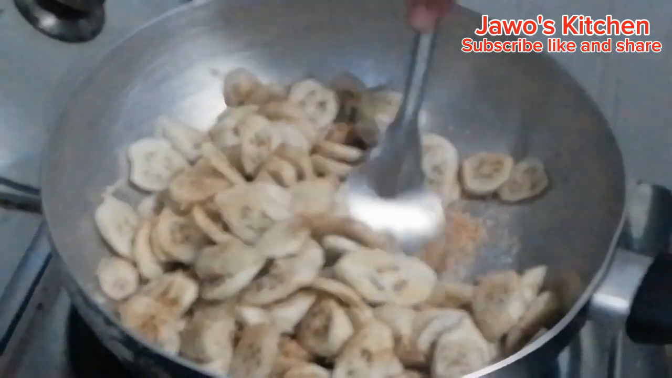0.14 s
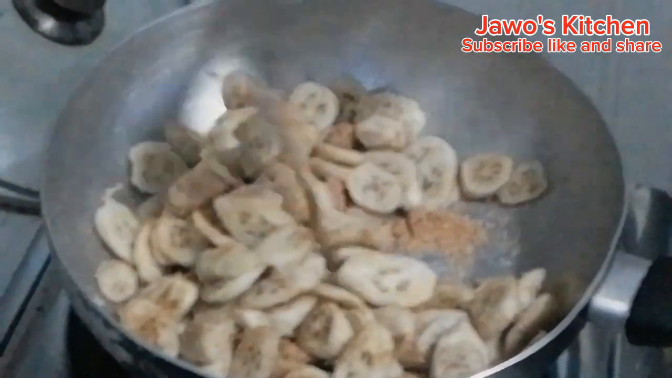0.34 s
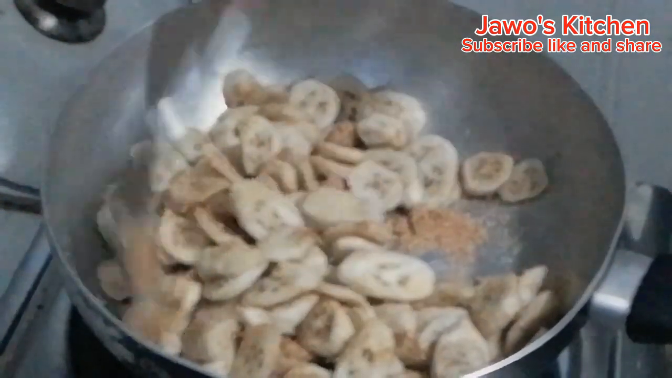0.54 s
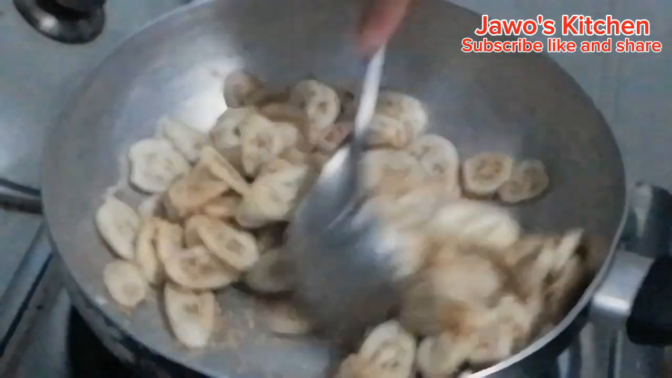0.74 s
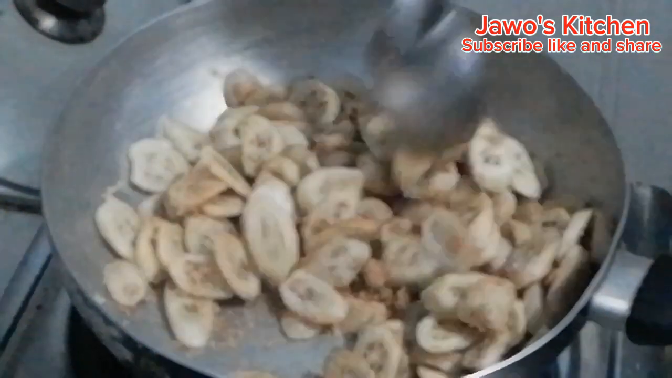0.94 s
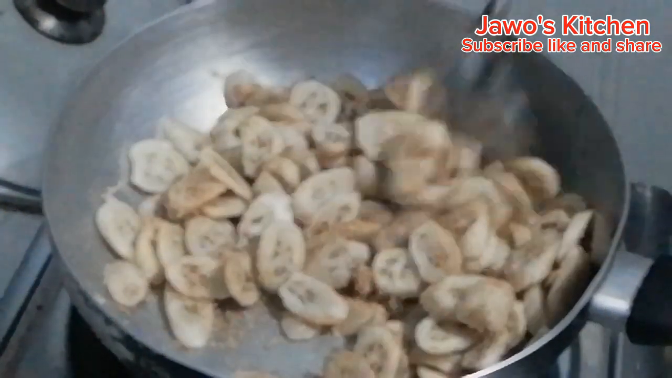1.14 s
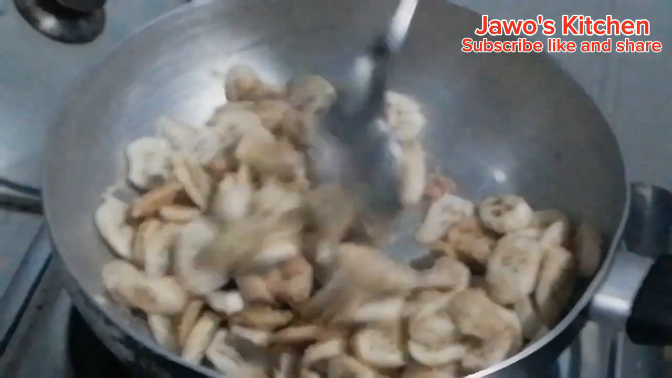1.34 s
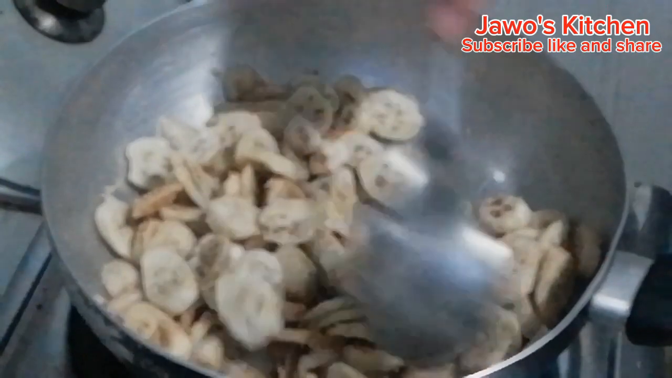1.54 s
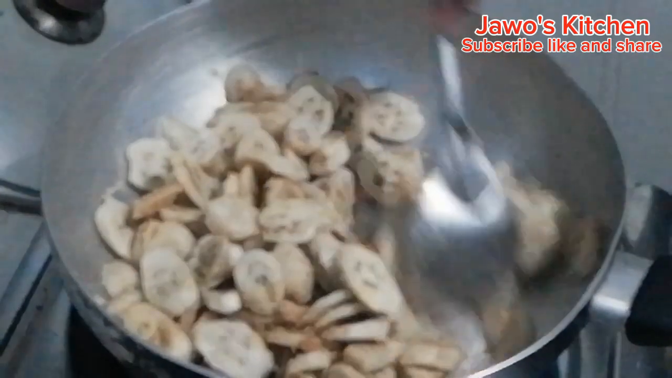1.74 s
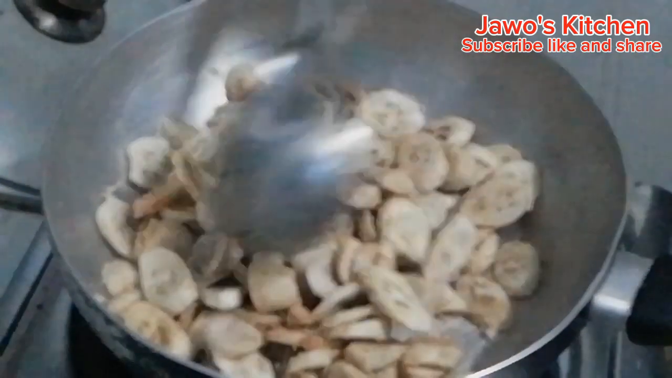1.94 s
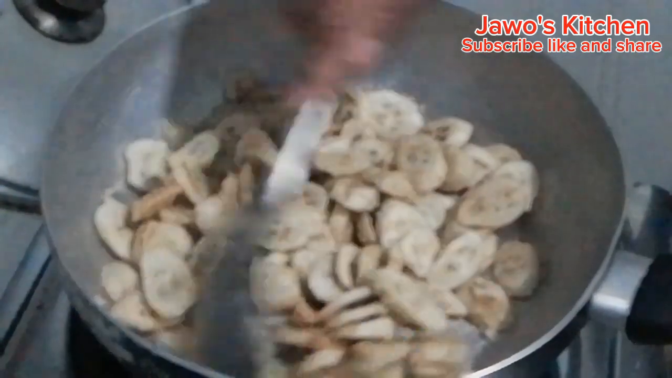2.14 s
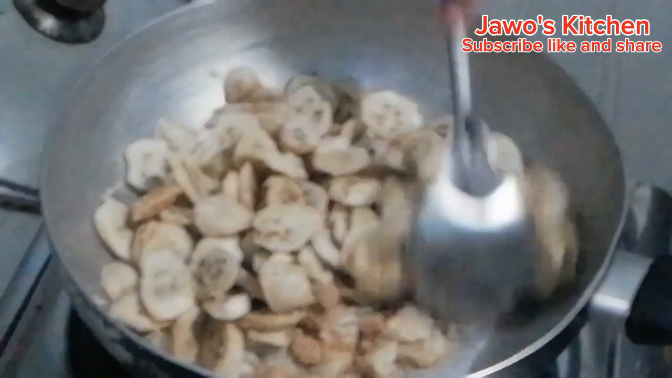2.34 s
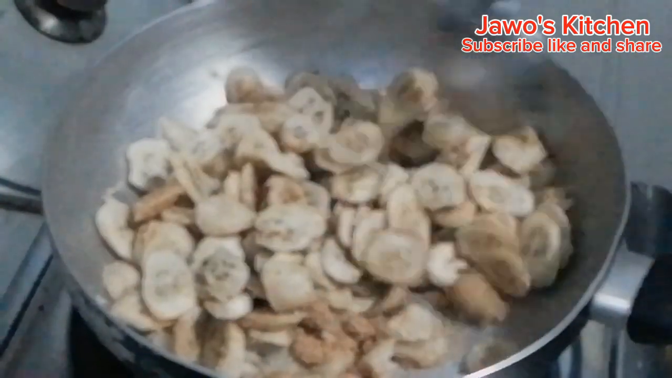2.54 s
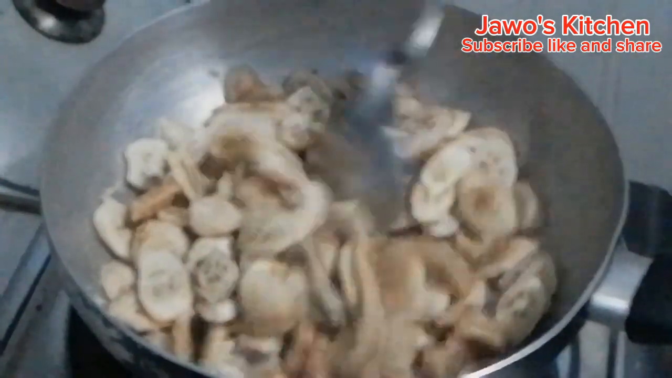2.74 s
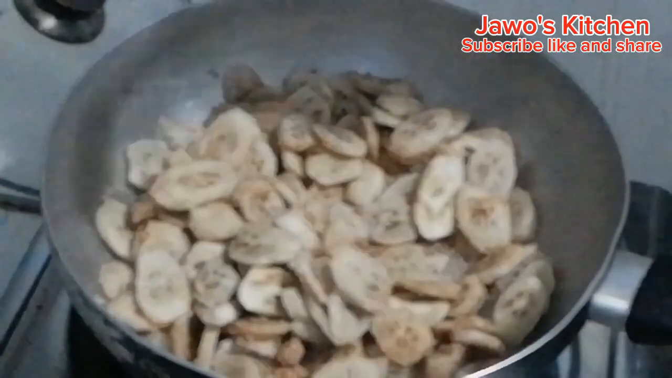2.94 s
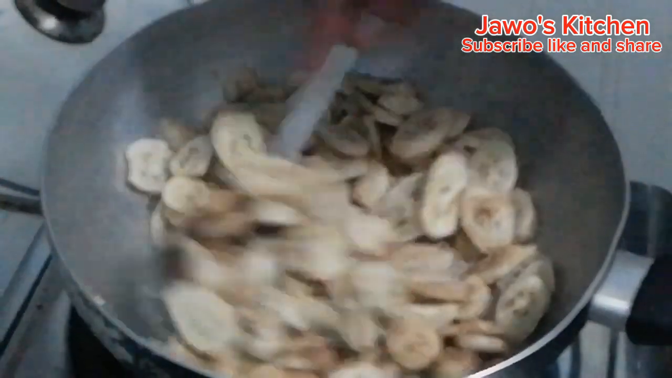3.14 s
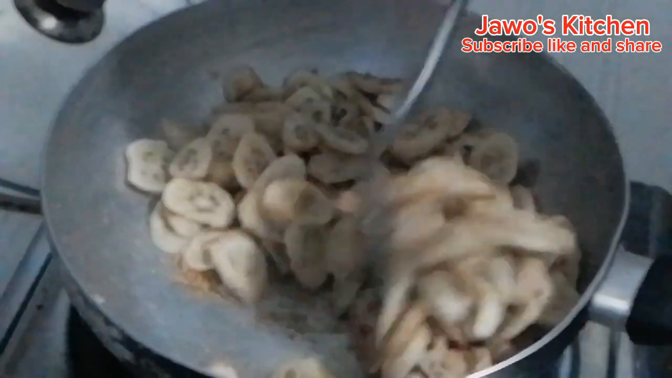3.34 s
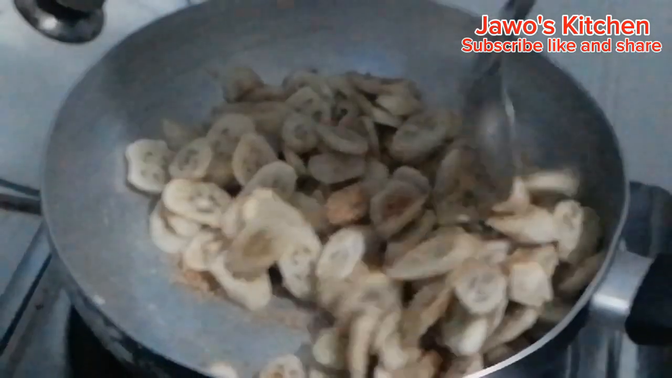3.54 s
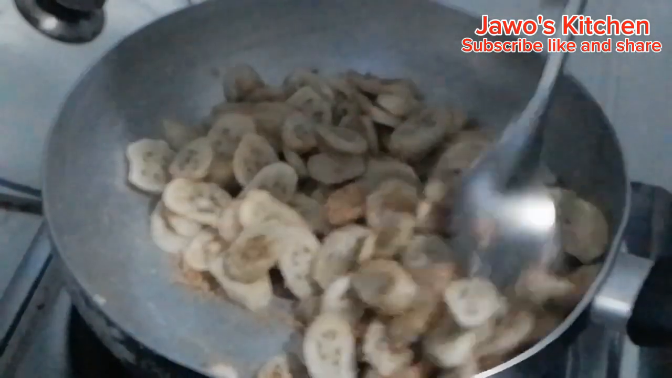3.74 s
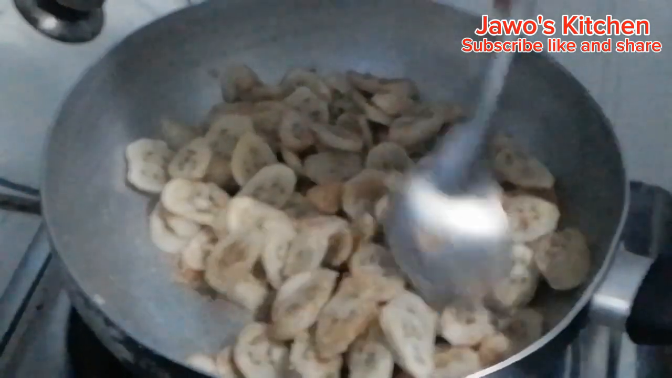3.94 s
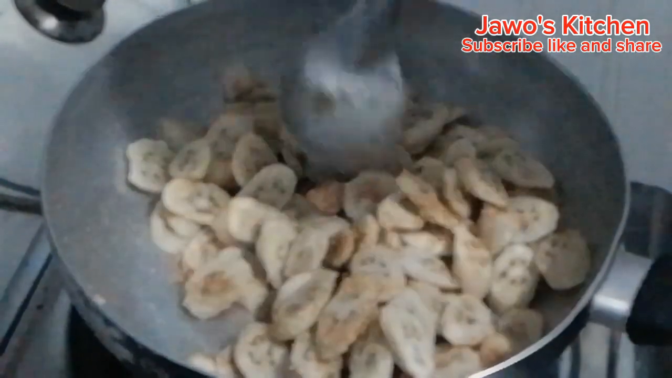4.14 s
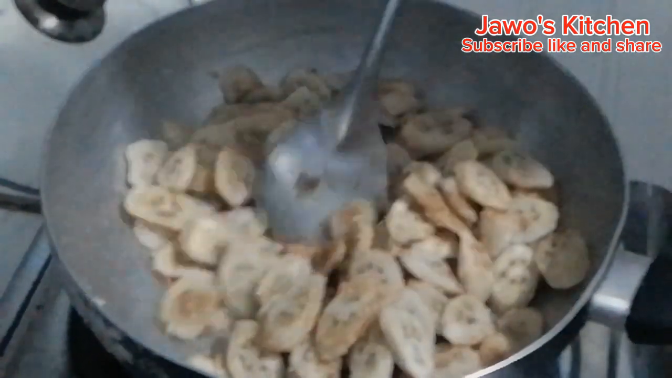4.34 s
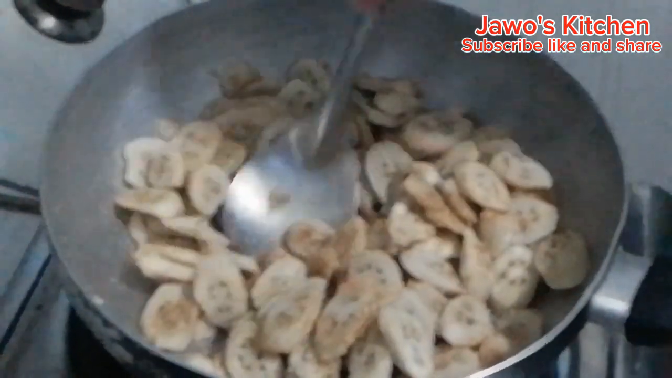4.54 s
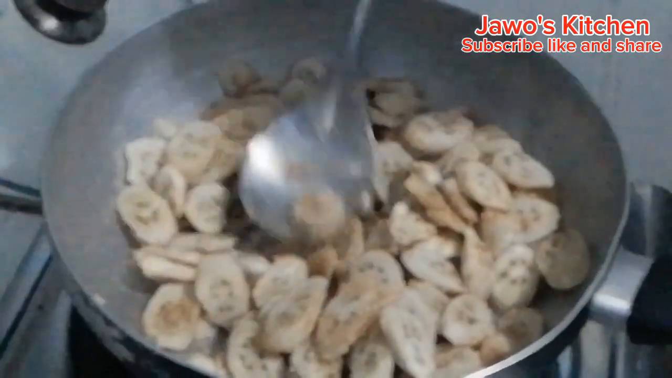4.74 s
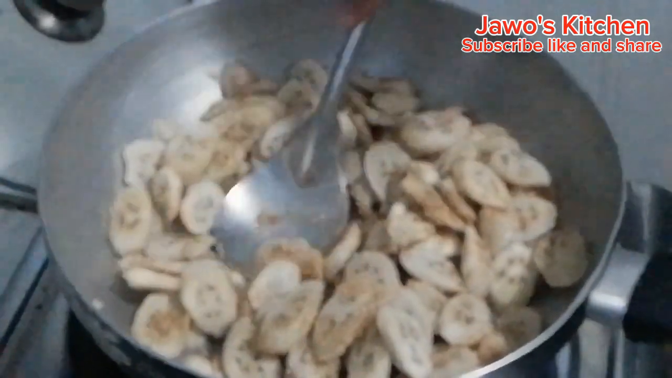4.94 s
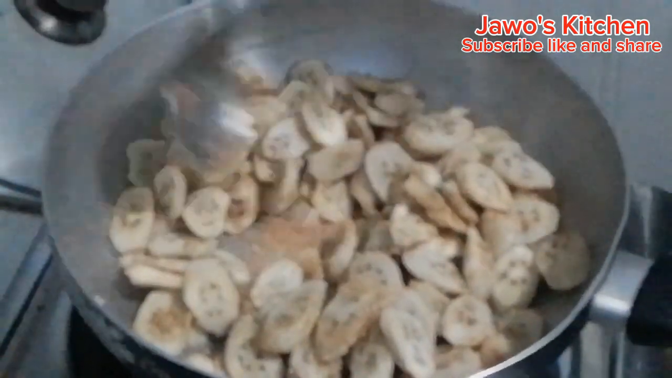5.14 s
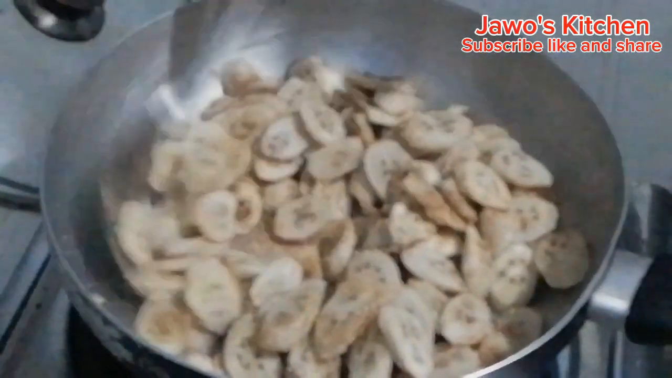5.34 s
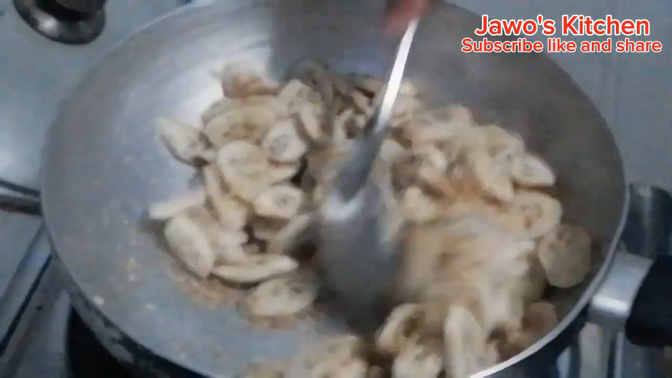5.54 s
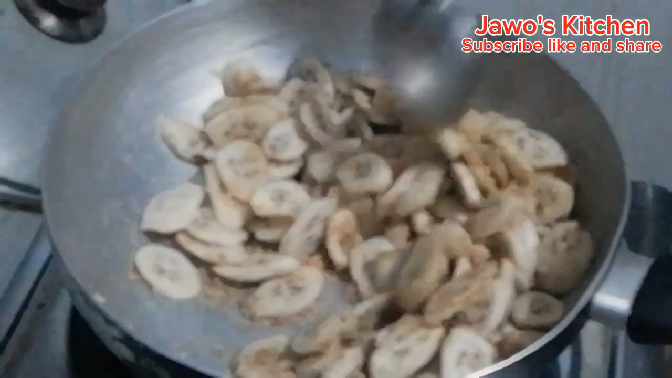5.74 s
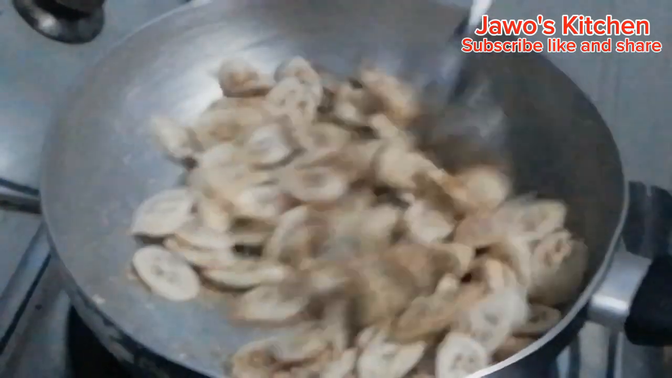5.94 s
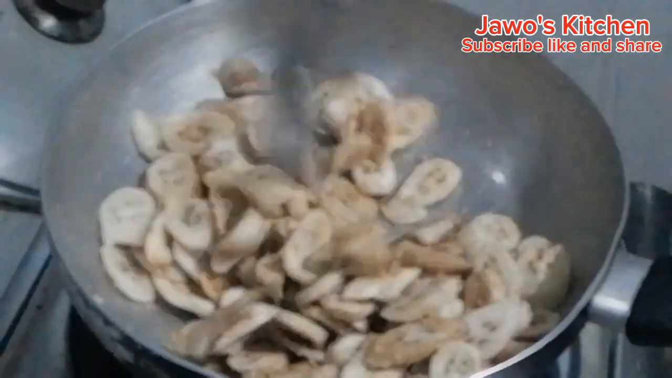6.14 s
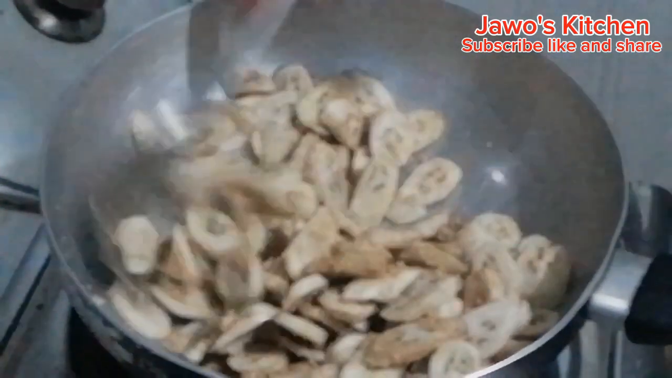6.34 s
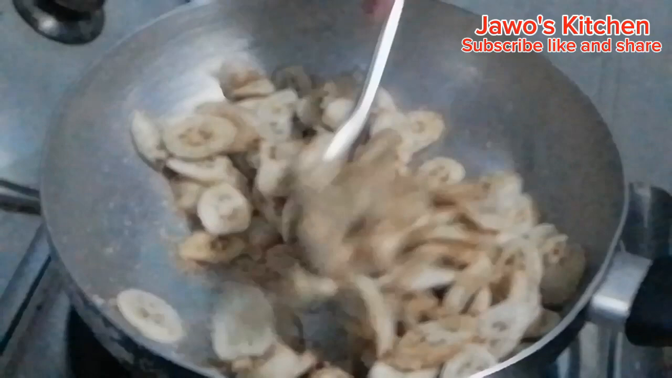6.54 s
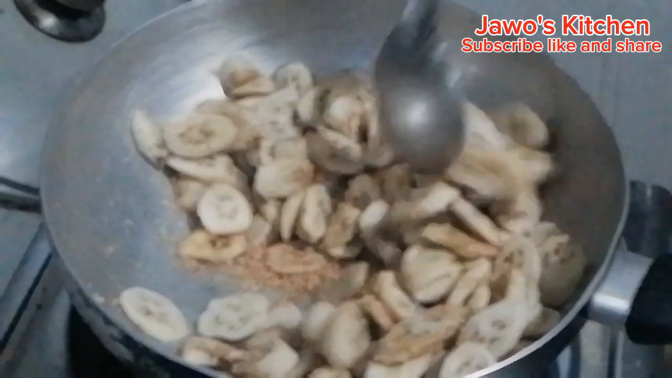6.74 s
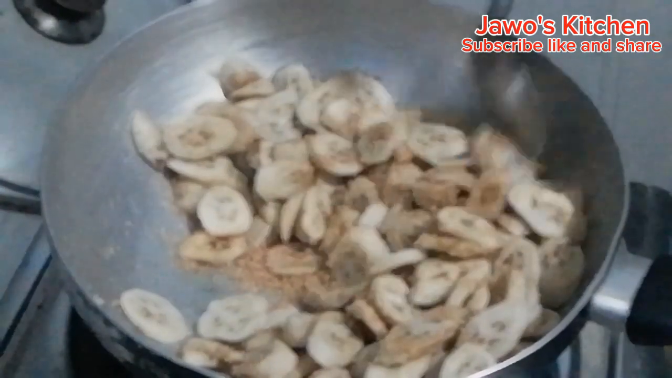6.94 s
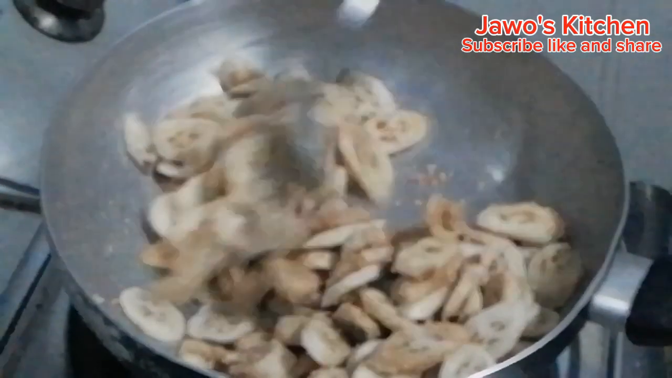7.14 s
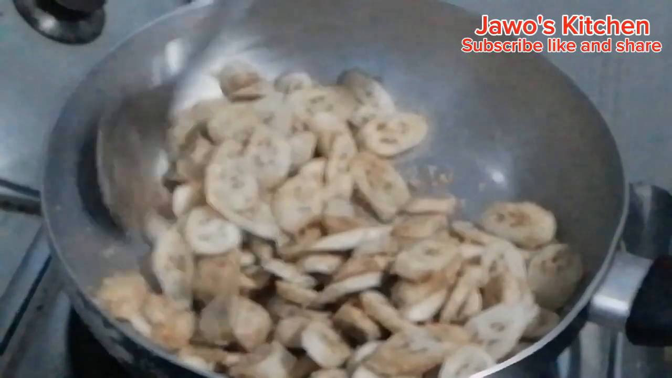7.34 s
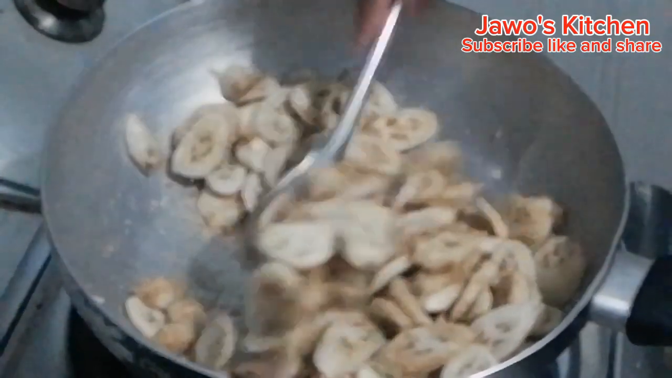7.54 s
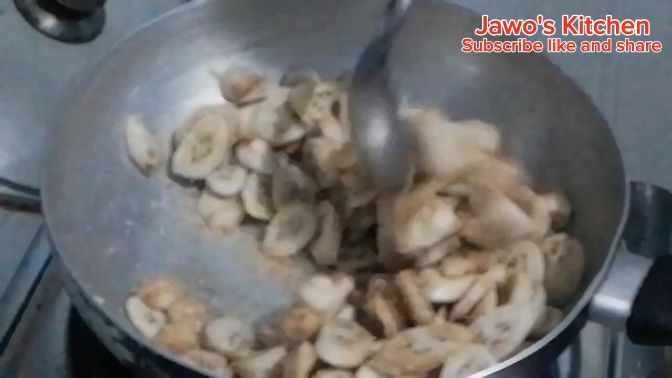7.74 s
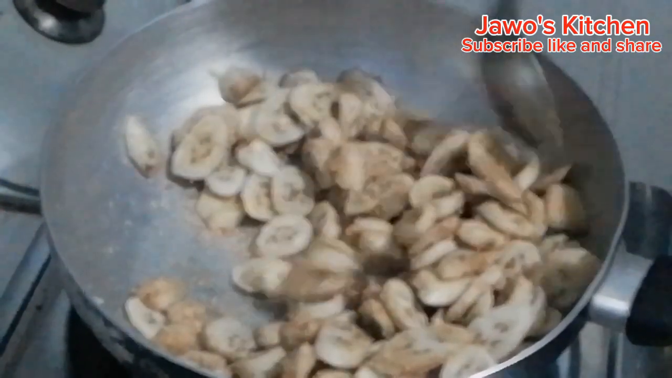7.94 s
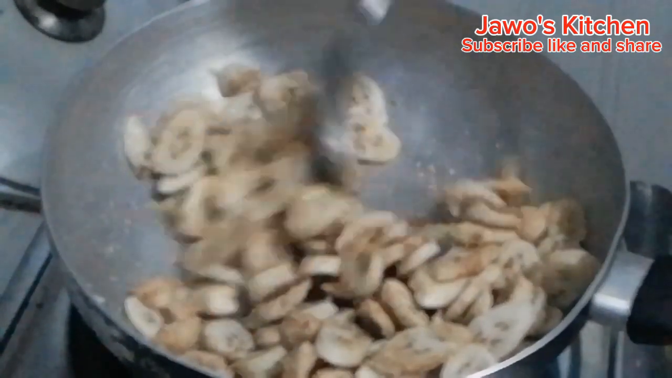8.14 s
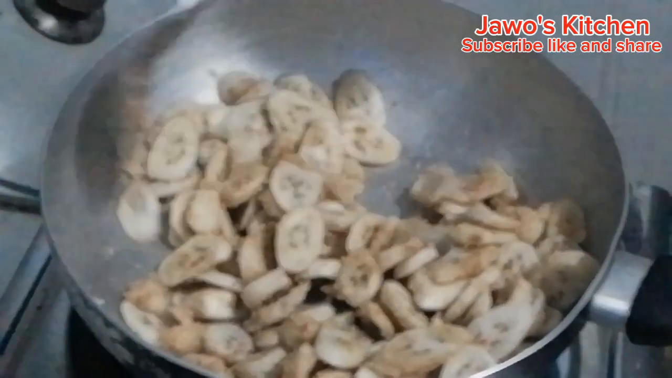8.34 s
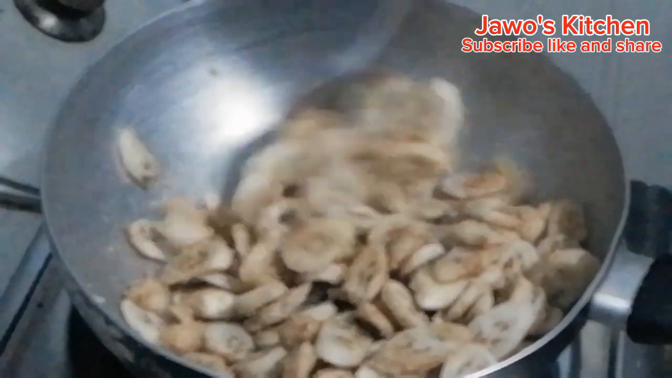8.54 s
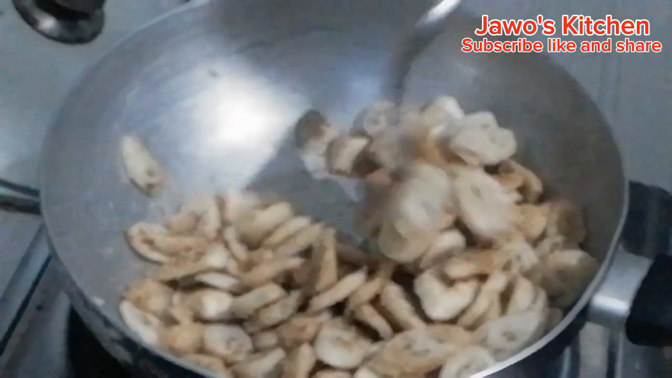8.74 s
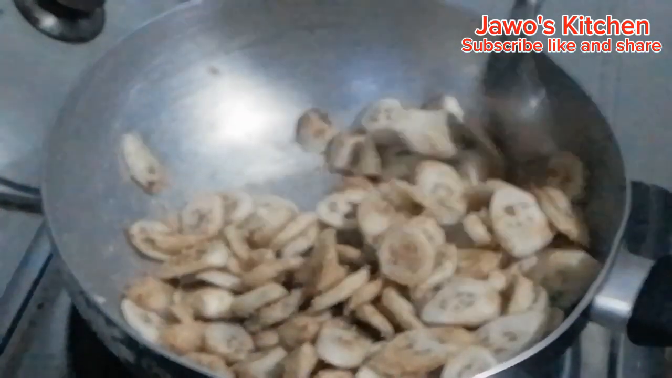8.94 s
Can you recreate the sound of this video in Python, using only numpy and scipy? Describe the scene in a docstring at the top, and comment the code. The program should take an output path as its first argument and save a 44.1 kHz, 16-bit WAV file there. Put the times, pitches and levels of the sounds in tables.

```python
"""A gritty scrape and a clack of steel open the scene: a ladle lands in a dry wok in a hard small kitchen.
It goes on scraping through crisp slices, stroke after stroke.
Friction is uneven bursts of noise, blows are short snaps and pings; both ring the modes of one bowl.
Behind lie soft hollow puffs of resonant noise and a low wavering hum of sine waves, drone and room tone.
Two spaced microphone ports hear it, the left one brighter."""
import sys
import numpy as np
from scipy import signal
from scipy.fft import rfft, irfft, next_fast_len
from scipy.io import wavfile
from scipy.ndimage import uniform_filter1d, map_coordinates

SR = 44100
rng = np.random.default_rng(int(sys.argv[2]) if len(sys.argv) > 2 else 0)


def to_wav(sig):
    """Store sig (one row per channel, or 1-D mono) as 16-bit WAV at the path in sys.argv[1].

    Samples outside -1..1 are clipped; the rate is SR.
    """
    pcm = np.clip(np.atleast_2d(sig), -1, 1) * 32767
    pcm = np.round(pcm).astype(np.int16)
    wavfile.write(sys.argv[1], SR, pcm.T)  # frames by channels


N = 400428  # length in samples


def amp(db):
    """Decibels turned into a plain gain."""
    return 10 ** (np.asarray(db) / 20)


def unit(x):
    """The signal scaled to an rms of one."""
    return x / np.sqrt(np.mean(x ** 2) + 1e-20)


def along(points, hz):
    """Read a curve of (Hz, value) points, joined by straight lines on a log frequency axis."""
    point_hz, values = np.transpose(points)
    return np.interp(np.log(hz + 1), np.log(point_hz + 1), values)


def filtered(x, response):
    """Filter x by multiplying its spectrum with a response, which may be complex."""
    size = 2 * next_fast_len((N + SR) // 2)  # spare room at the end, so tails do not wrap around
    spectrum = rfft(x, size) * response(np.fft.rfftfreq(size, 1 / SR))
    return irfft(spectrum, size)[..., :N]


def even(response):
    """The response scaled so that white noise keeps its level."""
    scale = np.sqrt(np.mean(np.abs(response(np.arange(1, SR // 2))) ** 2))
    return lambda hz: response(hz) / scale


def modes(table):
    """A sum of resonances that ring only after they are struck; a narrow one rings longer."""
    def response(hz):
        total = 0
        for k, (centre, width, db) in enumerate(table):
            damping = 1j * hz * width
            resonance = damping / (centre * centre - hz * hz + damping)
            total = total + (-1) ** k * amp(db) * resonance  # neighbours have opposite signs
        return total
    return even(response)


def causal(points):
    """Minimum-phase response: the gain curve of the (Hz, dB) points, with the sound as early as possible."""
    def response(hz):
        cepstrum = irfft(np.log(amp(along(points, hz)) + 1e-4))
        # folding the second half onto the first gives the minimum phase
        cepstrum[1:len(hz) - 1] *= 2
        cepstrum[len(hz):] = 0
        return np.exp(rfft(cepstrum))
    return even(response)


def swells(rows, sag_db, end_db):
    """Each row rises, sags slowly while it lasts and then dies faster; losses are in dB per second."""
    power = np.zeros(N + SR)
    t = np.arange(SR // 2) / SR
    for start, rise, length, db, *_ in rows:
        sag = sag_db * (t.clip(max=length) - rise).clip(0)
        ending = end_db * (t - length).clip(0)
        climb = (t / max(rise, 1 / SR)).clip(max=1)
        power[round(start * SR):][:len(t)] += (climb * amp(db - sag - ending)) ** 2
    return np.sqrt(power[:N])


def latest(rows, column):
    """For each sample, that column of the row that started last."""
    table = np.array(rows)
    started = np.searchsorted(table[:, 0] * SR, np.arange(N), side="right")
    return table[started.clip(1) - 1, column]


# How alike diffuse sound is at the two ports.
# Each row: frequency in Hz, likeness from -1 (opposite) to 1 (the same).
LIKENESS = [(60, 1.0), (130, 0.98), (290, 0.81), (640, -0.41), (1410, 0.23), (3100, 0.16), (6820, -0.082),
            (15000, -0.23)]


def diffuse(pair):
    """Two unrelated signals mixed to the likeness that spaced ports hear."""
    def mid_and_side(hz):
        angle = np.arccos(np.clip(along(LIKENESS, hz), -1, 1)) / 2
        return np.array([np.cos(angle), np.sin(angle)])
    mid, side = filtered(pair, mid_and_side)
    return np.array([mid + side, mid - side])


# Colour of the room tone. Each row: frequency in Hz, relative level in dB per Hz.
ROOM_TONE = [(15, -30), (45, -10), (130, -11), (234, -12), (280, -14), (433, -20), (1410, -22.5),
             (1870, -28), (5500, -35), (10400, -33), (16600, -51.5)]


def hum():
    """A motor of wavering speed and a fuzzy drone, alike at both ports, over the room tone."""
    motor_hz, motor_db = 28.1, [-58, -65.5, -65.5, -58.5]  # speed, and rms level of multiples 1 to 4
    drone_db, air_db = -58.0, -56.0
    knots = rng.standard_normal(N // 5000 + 4)  # one random speed every 5000 samples
    speed = 1 + .02 * map_coordinates(knots, [np.arange(N) / 5000])
    turn = 2 * np.pi * np.cumsum(motor_hz * speed) / SR
    motor = sum(np.sqrt(2) * amp(db) * np.sin((k + 1) * turn) for k, db in enumerate(motor_db))
    drone = filtered(rng.standard_normal(N), modes([(156.06, 1.9, 0)]))  # centre Hz, width Hz, dB
    air = filtered(rng.standard_normal((2, N)), even(lambda hz: amp(along(ROOM_TONE, hz))))
    return motor + amp(drone_db) * drone + amp(air_db) * diffuse(air)


# Soft hollow puffs. Each row: start in seconds, rise in seconds, length in seconds, level in dB,
# low resonances over high ones in dB.
PUFF_ROWS = [(0.27, 0.047, 0.14, -41.5, 0.5), (2.52, 0.075, 0.1, -38, 4), (2.7, 0.032, 0.23, -52, 23),
             (2.89, 0.058, 0.096, -46.5, 2), (4.27, 0.011, .2, -58, -29), (4.48, 0.051, 0.091, -39, 10),
             (4.6, 0.052, 0.11, -44, 20), (5.44, 0.0076, 0.17, -35.5, 9), (6.23, 0.065, 0.064, -39, 3),
             (7.08, 0.026, 0.22, -40, 2), (7.92, 0.021, 0.22, -38.5, 2.5), (9.02, 0.0051, 0.012, -32.5, -4)]
# Low and high group of puff resonances. Each row: frequency in Hz, width in Hz, relative level in dB.
HOLLOW_MODES = [
    [(619, 46, 7.5), (700, 153, 0), (890, 220, -6.5)],
    [(863, 49, -5.5), (1080, 380, -20.5), (1450, 170, -21.5)],
]


def puffs():
    """Soft airy swells of noise, each leaning to the lower or the higher hollow resonances."""
    level = swells(PUFF_ROWS, sag_db=49, end_db=105)
    level = uniform_filter1d(level, size=200)  # softens the corners
    lean = amp(latest(PUFF_ROWS, column=4))
    total = np.hypot(1, lean)  # the two shares together keep the power
    out = 0
    for share, table in zip([lean / total, 1 / total], HOLLOW_MODES):
        out = out + filtered(share * level * rng.standard_normal((2, N)), modes(table))
    return out


# Scraping strokes. Each row: start in seconds, rise in seconds, length in seconds, friction level in dB,
# then the weight in dB on the modes of the rim, the upper wall and the lower wall.
STROKE_ROWS = [ (0.0, 0.0013, 0.051, -29, -0.5, -12, -33), (0.03, 0.022, 0.036, -27, 0, -10, -11.5),
               (0.158, 0.0052, 0.017, -44, 3, 3, -11), (0.545, 0.027, 0.083, -47.5, -9, -25, -12),
               (0.619, 0.045, 0.24, -36, -5, -11, -10.5), (0.94, 0.03, 0.028, -52, -25, -5, -38),
               (1.108, 0.0063, 0.13, -24.5, -1.5, 1.5, -10),
               (1.579, 0.0016, 0.0068, -29.5, -9.5, -6.5, -19), (1.602, 0.062, 0.13, -35.5, -21, -9, -8),
               (1.706, 0.015, 0.035, -30, 1.5, 0, -1), (2.105, .003, 0.11, -36, -13, -9.5, -10),
               (2.202, 0.0021, .07, -28, -14, -4, -13), (2.259, 0.021, 0.057, -30, -5, -10.5, -8.5),
               (2.6, .11, 0.13, -42.5, -5.5, -6, -35), (3.013, 0.0022, 0.12, -24, -6, -14, -45),
               (3.102, 0.03, 0.22, -33, -4, -13, -19), (3.716, 0.085, 0.13, -40.5, -3.5, -13.5, -13),
               (4.188, 0.092, 0.13, -44.5, -1.5, -7.5, -6), (4.335, 0.034, 0.25, -36.5, 2, 1.5, -0.5),
               (4.446, 0.01, 0.03, -38.5, 6, 3.5, -7), (4.797, 0.023, 0.11, -39, 5, 3, -10),
               (4.942, 0.044, 0.043, -37, 6.5, -0.5, -10), (5.249, 0.0028, 0.18, -25, -11, -13.5, -12),
               (5.387, 0.04, 0.19, -39, 7, -2, 0), (5.456, 0.0092, 0.043, -36.5, 4.5, 8, -3.5),
               (5.858, 0.066, 0.24, -38, -2.5, -17, -14.5), (5.986, 0.024, 0.067, -72, 6, 4, -1.5),
               (6.314, 0.0019, 0.041, -26.5, -10, -18.5, -38), (6.357, 0.0045, 0.053, -29, -12, -54, -22),
               (6.421, 0.026, 0.046, -36.5, -2.5, -2.5, -2.5), (6.67, 0.052, 0.16, -52.5, -10, -12, -37),
               (6.963, 0.0044, 0.088, -25.5, -0.5, -1, -8.5), (7.361, 0.024, 0.1, -23.5, -8, -50, -19),
               (7.502, 0.0062, 0.13, -48, -4, -6.5, -2.5), (7.8, 0.035, 0.073, -53, -23, -5.5, -31),
               (8.001, 0.0019, 0.098, -31, -0.5, 0.5, -14.5), (8.427, 0.022, 0.026, -22.5, -14.5, -39, -42),
               (8.492, 0.025, 0.026, -28.5, -6, -25, -29), (8.917, 0.3, .18, -29, -8, -17, -18)]
# How long the kitchen rings. Each row: frequency in Hz, time in seconds to fall by 60 dB.
ROOM_DECAY = [(200, 0.55), (1000, 0.47), (4000, 0.41), (12000, 0.16)]


def kitchen(x):
    """The room answers each stroke anew; each frequency dies at its own speed."""
    wet = np.zeros((2, N + SR))
    starts = [round(row[0] * SR) for row in STROKE_ROWS] + [N]
    for begin, end in zip(starts, starts[1:]):
        hz, t, z = signal.stft(rng.standard_normal((2, SR // 2)), SR, nperseg=256)
        decay = amp(-60 * t / along(ROOM_DECAY, hz)[:, None])
        tail = signal.istft(z * decay, SR, nperseg=256)[1]
        tail = tail / np.linalg.norm(tail[0])
        source = x[:, begin:end].mean(0)[None]
        echo = signal.fftconvolve(source, tail, axes=1)
        wet[:, begin + 100:][:, :echo.shape[1]] += echo  # the answer comes 100 samples late
    return diffuse(wet[:, :N])


# The bowl rocks on its stand. Each row: time in seconds, level in dB of the push,
# extra level in dB for the second group of low modes.
THUMP_ROWS = [(0.617, -41.5, 14), (1.112, -42.5, -24), (1.595, -38, 6), (1.712, -45, 11), (2.15, -42, 5),
              (2.208, -44.5, 12), (3.023, -51.5, 27), (3.075, -56, 20), (3.135, -59.5, 19), (5.027, -38, 3),
              (5.268, -58, 34), (5.363, -52.5, 19.5), (5.982, -41, 7.5), (6.312, -50.5, 13.5),
              (7.012, -56.5, 23.5), (8.007, -39.5, 9), (9.026, -40, 11)]
# Two groups of low bowl modes. Each row: frequency in Hz, width in Hz, relative level in dB.
BOTTOM_MODES = [
    [(257, 18, 2), (284.9, 12.1, 7.5), (507, 144, -7.5)],
    [(393.6, 10.7, 8.5)],
]


def thumps():
    """Each rock gives the low modes of the bowl one soft push."""
    push = np.zeros((2, N))
    for start, db, second_db in THUMP_ROWS:
        push[:, round(start * SR)] = amp(db + np.array([44, 33.0 + second_db]))
    push = uniform_filter1d(uniform_filter1d(push, size=30), size=30)  # a soft contact
    return sum(filtered(p, modes(table)) for p, table in zip(push, BOTTOM_MODES))


# Ladle and slice contacts. Each row: time in seconds, level in dB, ping frequency in Hz,
# level of the snap in dB against that level.
BLOW_ROWS = [(0.0372, -12, 4140, -5), (0.0575, -24, 5000, 4), (0.067, -13, 2913, -4),
             (0.1022, -16, 7160, -10), (0.166, -20, 3410, -10.5), (0.6174, -11, 800, -9),
             (1.11, -5, 2200, -8.5), (1.147, -1.5, 1220, -42), (1.5832, -18, 2080, 10),
             (1.727, -7, 945, -27), (1.728, -9, 3260, -18), (1.762, -9, 2493, -14.5),
             (2.109, -25.5, 5500, 6), (2.2087, -11, 5530, -8), (2.262, -15.5, 1450, -22),
             (3.0116, -28.5, 4120, 7.5), (3.0203, -14, 1507, -5), (3.1159, -10.5, 3570, -9),
             (3.175, -17.5, 2370, -14), (3.1969, -16.5, 2442, -6), (4.2055, -29.5, 8500, -15),
             (4.3584, -20, 8140, -8), (4.4823, -21, 3960, -5), (4.5508, -20.5, 3510, -8.5),
             (4.8511, -19, 2550, -11.5), (4.9681, -20, 2470, -5.5), (5.249, -7.5, 1450, -5),
             (5.2777, -19.5, 1236, 7), (5.322, -19.5, 5640, 0), (5.4002, -26.5, 3420, -16),
             (5.42, -14, 3420, -26), (5.478, -7.5, 2500, -42), (5.489, -15.5, 1645, -25.5),
             (5.985, -9, 2490, -3.5), (6.362, -13, 5550, 4), (6.383, -12.5, 3400, -10),
             (6.484, -15, 2530, -13.5), (6.7136, -45.5, 1540, 10.5), (6.9694, -8, 2045, -6),
             (6.995, -10.5, 1275, -45), (7.379, -29, 2620, 12.5), (7.402, -10.5, 4640, -9),
             (7.5026, -19.5, 1607, -8.5), (7.504, -23, 900, -30), (8.004, -12.5, 4050, 6.5),
             (8.4387, -25.5, 5850, -3), (8.4488, -21, 9100, -5), (8.4614, -21, 4030, 4),
             (8.5494, -21.5, 4870, 2.5), (8.7198, -30.5, 3230, -5.5), (8.803, -28.5, 1620, -14),
             (8.814, -32.5, 5950, 1.5), (9.0212, -27, 3850, 3), (9.0281, -11, 4070, -12),
             (9.055, -15, 3370, 2.5)]


def blows():
    """A snap, a chatter of steel on steel, and a rough ping where the bowl is struck."""
    force, ping = np.zeros((2, N + SR)), np.zeros((2, N + SR))
    t = np.arange(SR // 12) / SR
    for start, db, hz, snap_db in BLOW_ROWS:
        at = round(start * SR)
        snap = amp(snap_db - 60 * t / 0.011)  # falls 60 dB in 11 ms
        chatter = 0.25 * amp(0.29 * snap_db - 60 * t / 0.11) * (1 - np.exp(-t / 0.003))
        noise = rng.standard_normal((2, len(t)))
        force[:, at:][:, :len(t)] += amp(db + 7.5) * (snap + chatter) * noise
        # slow random strengths of sine and cosine make the ping rough
        rough = uniform_filter1d(rng.standard_normal((2, 2, len(t))), size=140)
        tone = rough[0] * np.sin(2 * np.pi * hz * t) + rough[1] * np.cos(2 * np.pi * hz * t)
        decay = amp(db + 18 - 60 * t / 0.072) * (1 - np.exp(-t / 0.00096))
        ping[:, at:][:, :len(t)] += decay * tone
    return diffuse(force[:, :N]), ping[:, :N]


def clatter(per_second, spread_db, t60, smooth, count):
    """Crisp slices knock about: short bursts of uneven size, each loudest near its own band, on a smooth rub."""
    t = np.arange(SR // 20) / SR
    when = rng.random(N) < per_second / SR
    size_db = spread_db * rng.standard_normal(N).clip(-2, 1.6)
    pitch = rng.uniform(0, count, N)  # the place of each burst on the row of bands
    noise = rng.standard_normal((2, N))
    centres = np.geomspace(900, 13000, count)  # Hz
    out = 0
    for k in range(count):
        starts = when * amp(size_db - 3.5 * np.abs(pitch - k))  # 3.5 dB less for each band away
        bursts = signal.fftconvolve(starts, amp(-60 * t / t60))[:N]
        shape = smooth + unit(bursts)
        band = lambda hz: np.interp(np.log(hz + 1), np.log(centres), np.arange(count) == k)
        out = out + shape * filtered(noise, band)
    return unit(diffuse(out))


def wandering(x, depth_db):
    """The point of contact moves, so the colour shifts in patches from moment to moment."""
    z = signal.stft(x, nperseg=512)[2]
    field = rng.standard_normal(z.shape[1:])
    field = uniform_filter1d(field, size=4, axis=0)  # over frequency
    field = uniform_filter1d(field, size=7, axis=1)  # over time
    gain_db = depth_db * unit(field) - depth_db ** 2 / 8.7  # the last term keeps the mean power
    return signal.istft(z * amp(gain_db), nperseg=512)[1][:, :N]


# The bowl rumbles on its stand while it is pushed.
# Each row: start in seconds, rise in seconds, length in seconds, level in dB.
RUMBLE_ROWS = [(4.33, 0.034, 0.098, -43), (6.72, 0.0092, 0.13, -46.5), (8.4, 0.0065, 0.23, -43)]
# Colour of the friction and of a blow. Each row: frequency in Hz, relative level in dB per Hz.
GRIT_COLOUR = [(2500, -27), (4300, -5), (7000, -7), (10500, -1), (12000, -9.5), (15300, -17), (16600, -53)]
SNAP_COLOUR = [(700, -32), (2200, -4), (9000, 8), (16600, -19)]
# Modes of the rim, upper wall and lower wall of the bowl, and the high modes of the steel.
# Each row: frequency in Hz, width in Hz, relative level in dB.
RIM_MODES = [(2460, 71, 8), (2490, 28, 1), (2430, 76, -3), (3152, 117, 1), (3350, 1830, 12.5),
             (4050, 30, 20)]
UPPER_WALL_MODES = [(1218, 133, 4), (1236, 45, 10.5), (1502, 35, 12.5), (1526, 110, 11), (1623, 36, -9),
                    (1880, 120, -1), (1620, 860, 4)]
LOWER_WALL_MODES = [(796, 16, 13), (872.4, 20, 15.5), (919, 125, 7.5), (707, 1280, -4.5)]
STEEL_MODES = [(5450, 50, -2), (6580, 15, 29), (10800, 170, -14), (10630, 2000, 4)]


def ladle():
    """Friction and blows drive the broad crunch and the modes of the bowl."""
    lift_db = 226  # loss in dB per second after the ladle lifts
    drag = swells(STROKE_ROWS, sag_db=88, end_db=lift_db)
    grit = clatter(per_second=150, spread_db=4.5, t60=0.028, smooth=0.9, count=6)
    rub = amp(8.5) * wandering(drag * grit, depth_db=3.0)
    hit, ping = blows()
    force = rub + amp(-0.5) * hit
    crunch = filtered(rub, causal(GRIT_COLOUR)) + filtered(hit, causal(SNAP_COLOUR))
    ring = amp(-17.0) * filtered(force, modes(STEEL_MODES))
    bowl = 0
    for k, table in enumerate([RIM_MODES, UPPER_WALL_MODES, LOWER_WALL_MODES]):
        weight = amp(latest(STROKE_ROWS, column=4 + k))
        bowl = bowl + filtered(weight * force, modes(table))
    shake = swells(RUMBLE_ROWS, 21, lift_db) * diffuse(rng.standard_normal((2, N)))
    # a drag low in the bowl shakes the bottom
    low_drag = amp(latest(STROKE_ROWS, column=6) - 7.5) * rub
    rumble = filtered(low_drag + shake, modes(BOTTOM_MODES[0] + BOTTOM_MODES[1]))
    return crunch + ring + amp(-0.5) * bowl + rumble + ping + thumps()


def scene():
    """The wok with its room, over the puffs and the hum."""
    wok = ladle()
    wok_in_room = wok + amp(-1.5) * kitchen(wok)
    return amp(-12) * wok_in_room + diffuse(puffs()) + hum()


# Brightness of the left port. Each row: frequency in Hz, left over right in dB.
LEFT_OVER_RIGHT = [(1500, 0), (4000, 1), (8000, 4.5), (15000, 6.5)]


def record(dry):
    """The left port is brighter, the loudest peaks are rounded off, nothing is kept above the band limit."""
    top_hz = 16600
    ports = filtered(dry, lambda hz: amp(np.outer([.5, -.5], along(LEFT_OVER_RIGHT, hz))))
    rounded = ports / (1 + np.abs(ports / .9) ** 4) ** (1 / 4)  # never passes 0.9
    return filtered(rounded, lambda hz: hz < top_hz)


dry = scene()
out = record(dry)
to_wav(out)
```